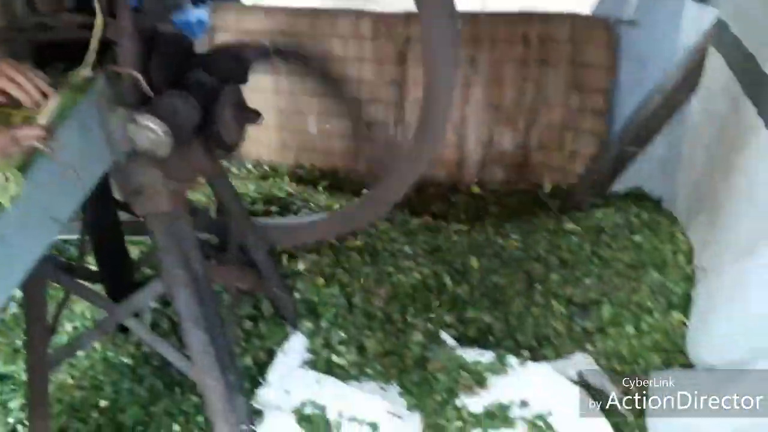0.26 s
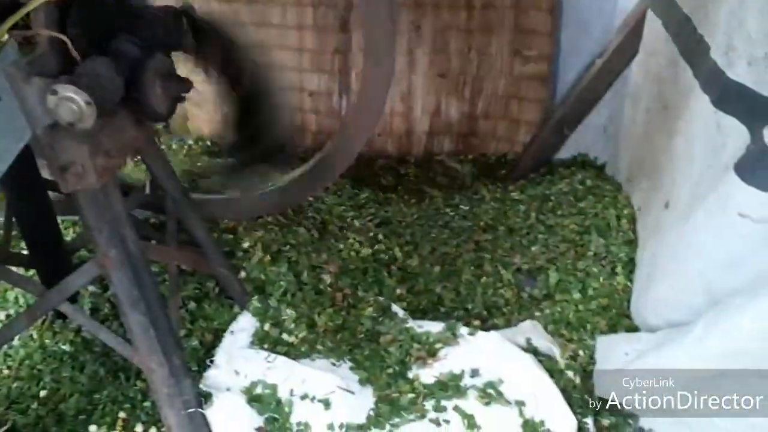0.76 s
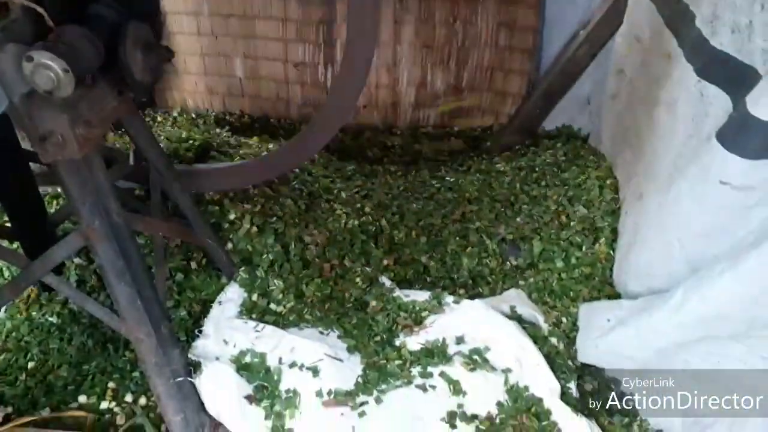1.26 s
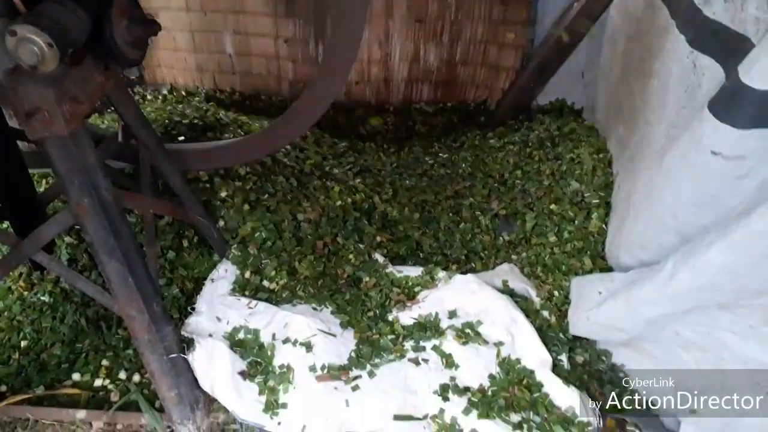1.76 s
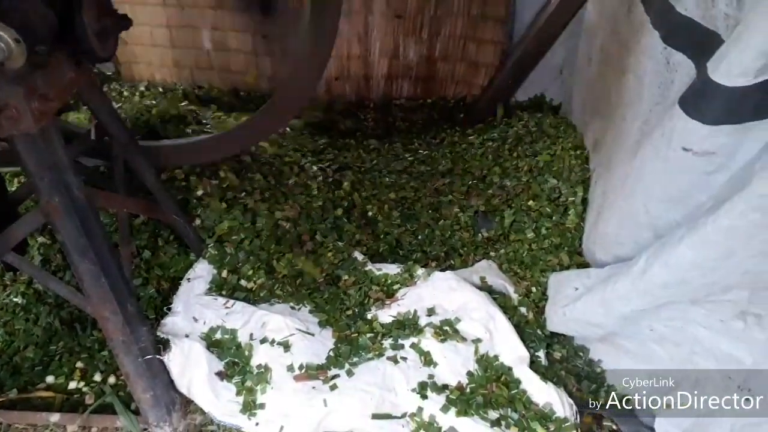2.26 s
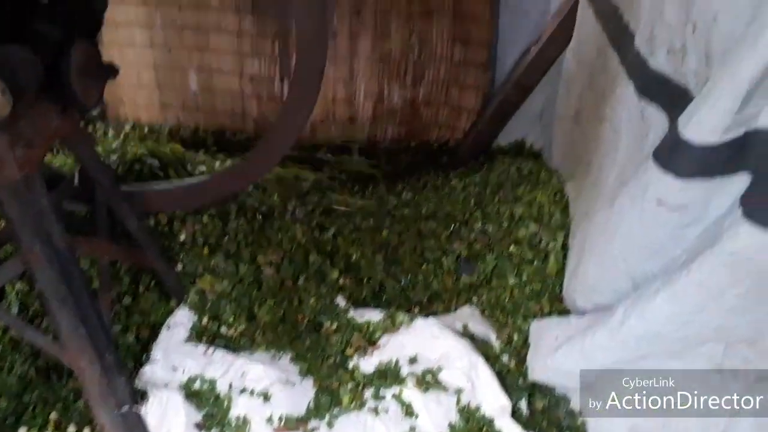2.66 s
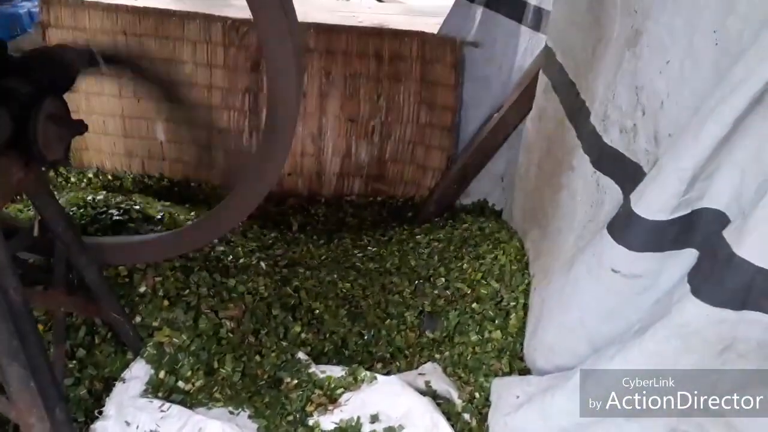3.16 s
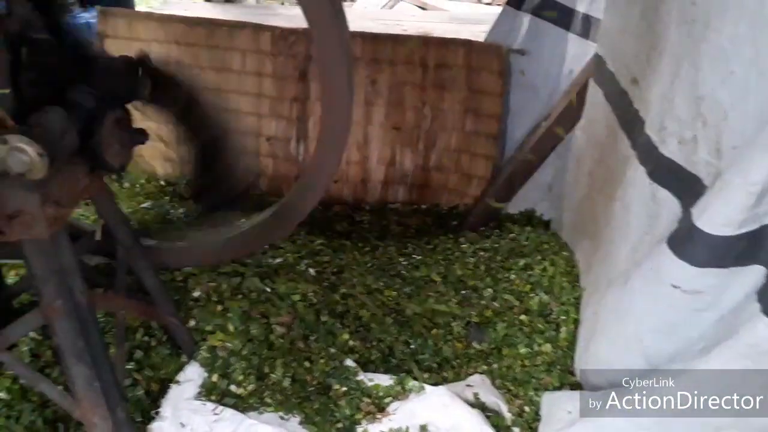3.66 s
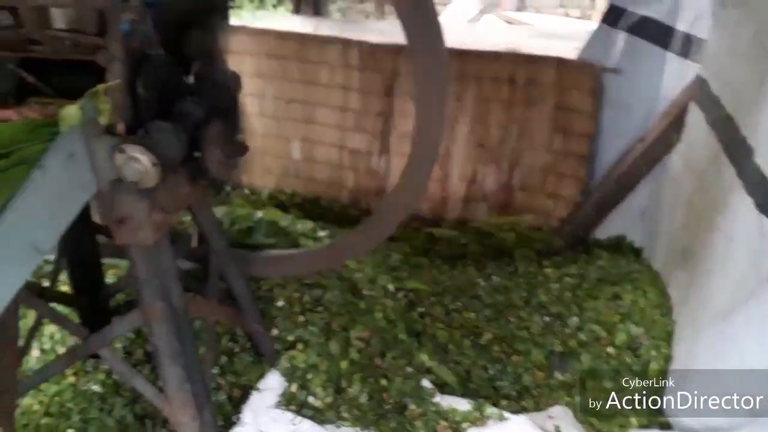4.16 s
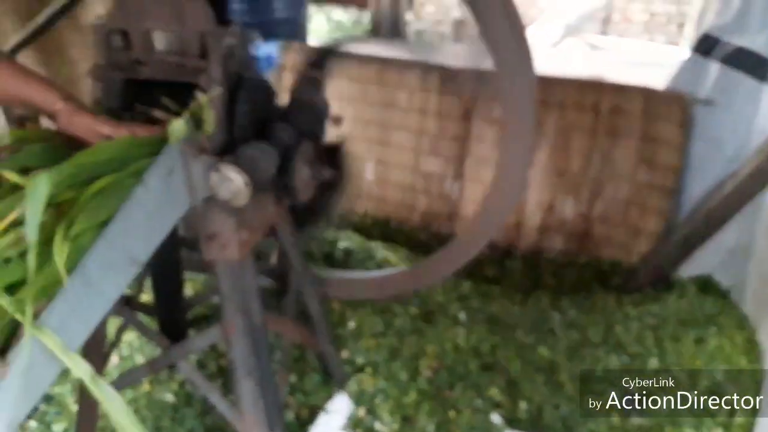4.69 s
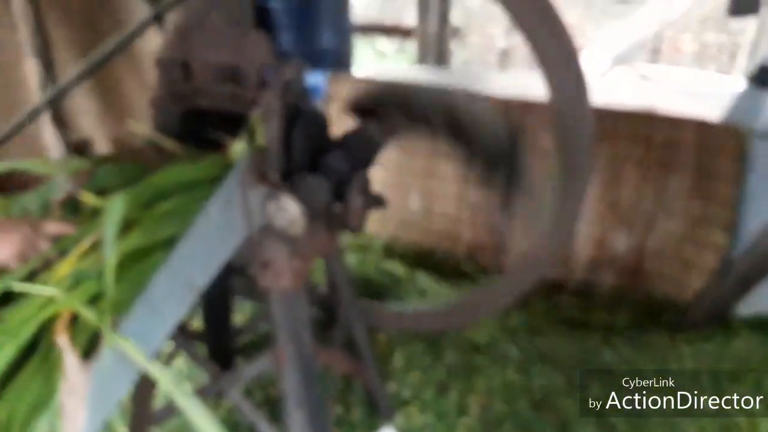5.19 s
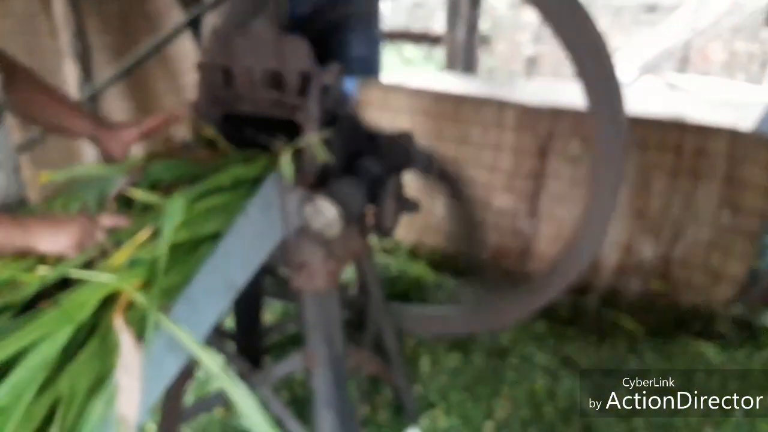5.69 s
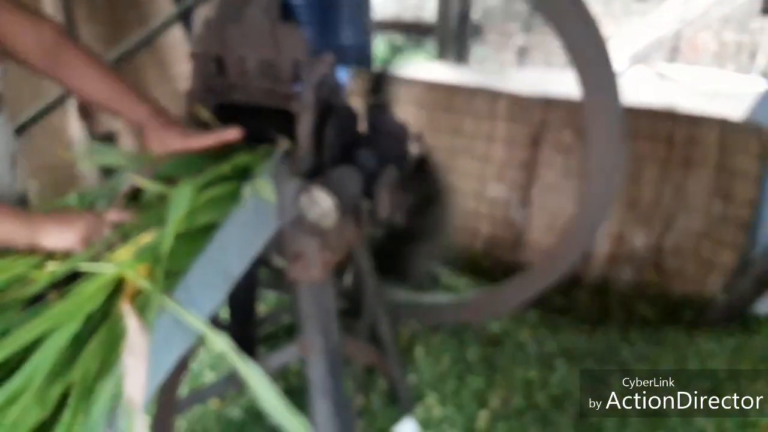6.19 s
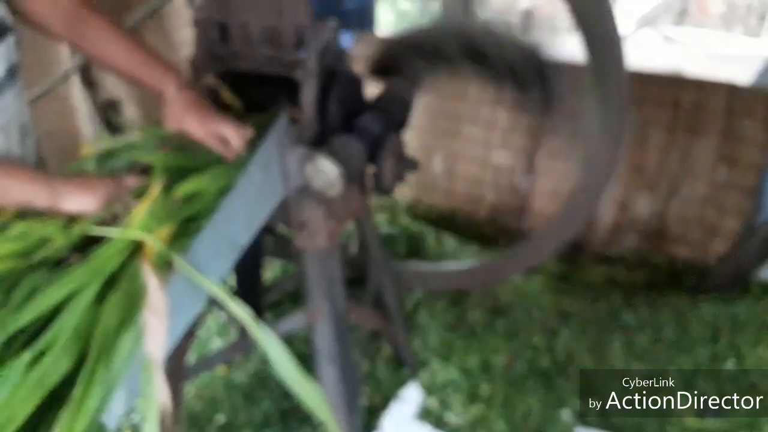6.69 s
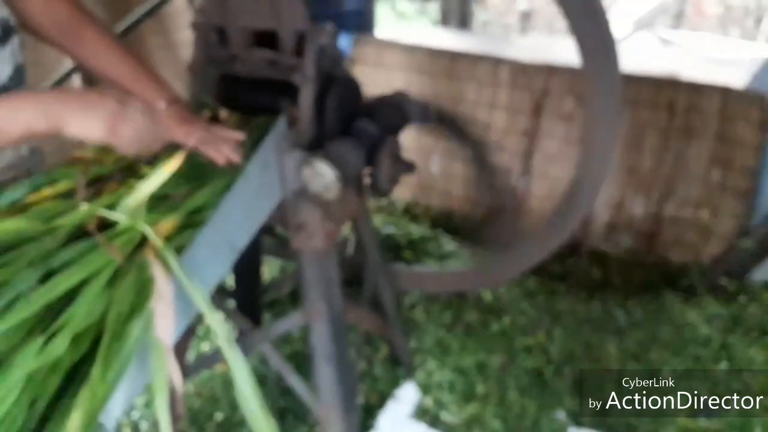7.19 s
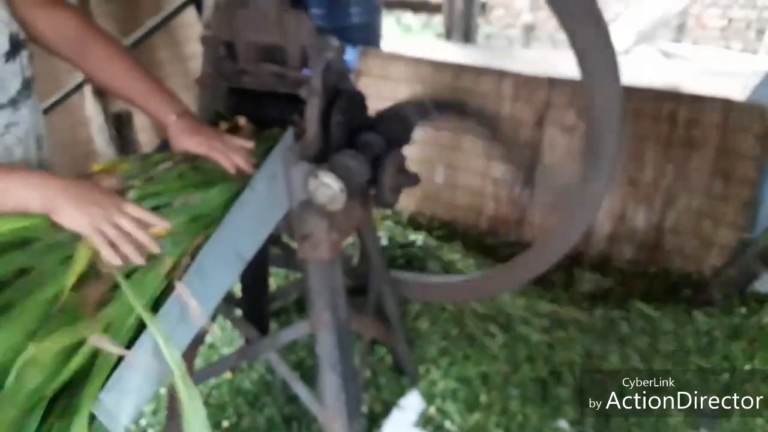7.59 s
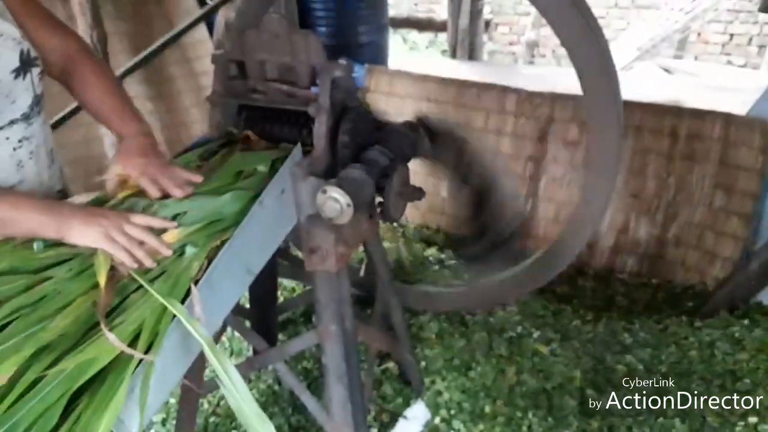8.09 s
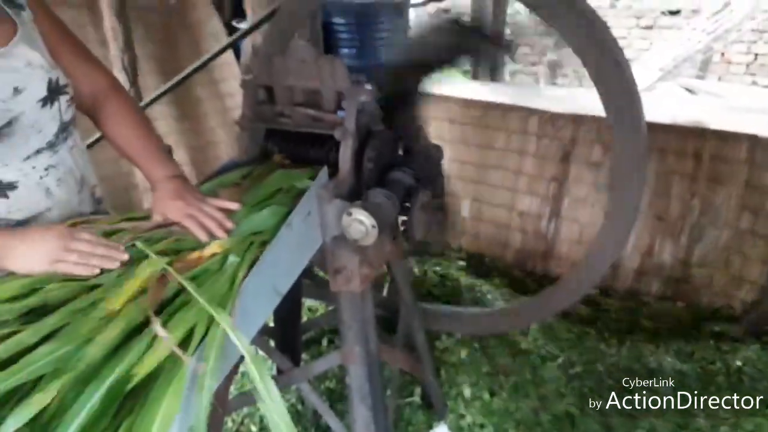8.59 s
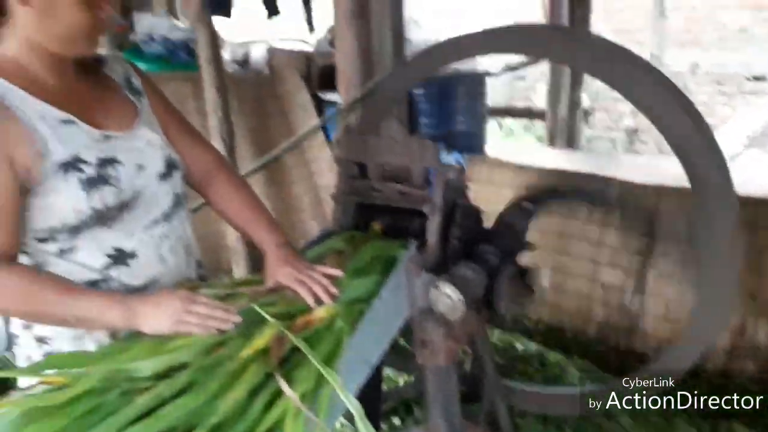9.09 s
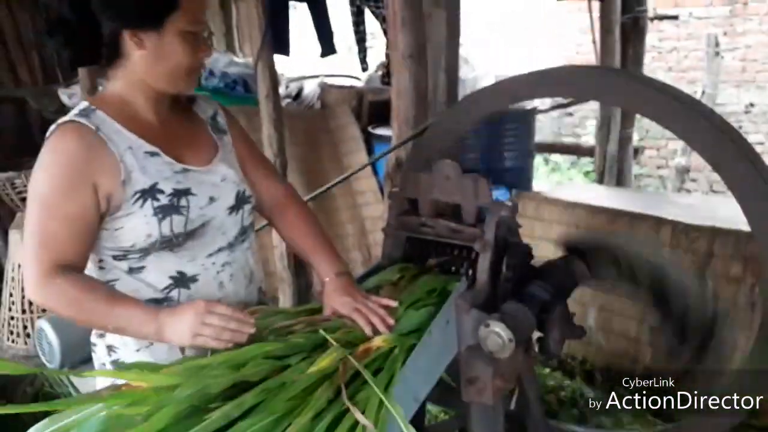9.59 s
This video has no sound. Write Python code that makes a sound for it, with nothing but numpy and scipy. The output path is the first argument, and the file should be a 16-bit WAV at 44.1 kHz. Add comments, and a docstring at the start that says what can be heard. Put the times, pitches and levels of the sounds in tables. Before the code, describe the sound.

Close in an open shed, a heavy iron flywheel cutter chops green grass at almost three cuts a second. Each stroke fizzes, crunches and thumps, followed by a metallic rebound, a brief scrape and a patter of chaff. Loose gears clack unevenly between cuts over a rumbling frame. The cuts are fuller early on, then lighter with more prominent clacks. A small handheld microphone gives little deep bass.

```python
"""Flywheel chaff cutter in a shed

A belt-driven flywheel chaff cutter chops green grass in an open shed, nearly three cuts a second.
Each knife crunches through the bundle (random snaps), thumps on the shear plate and rebounds.
A thicker bite makes the crunch, the scrape of steel and the shower of chaff louder.
Between cuts loose gears clack (bursts of impacts) and the knife rubs, with a squeal now and then
(a wavering tone), over a rumble."""
import sys
import numpy as np
from scipy import signal
from scipy.io import wavfile

SR = 44100
rng = np.random.default_rng(int(sys.argv[2]) if len(sys.argv) > 2 else 0)


def output_pcm(signal):
    """Save a mono or channel-first signal as 16-bit PCM at the path in sys.argv[1].

    Samples are clipped to [-1, 1] before scaling.
    """
    pcm = np.clip(np.atleast_2d(signal).T, -1, 1) * 32767
    wavfile.write(sys.argv[1], SR, np.round(pcm).astype(np.int16))


N = 434385

# Levels in the tables are relative: each source adds its own offset.
# knife passes: (closing thump [s], bite thickness re usual [dB], thump [dB],
#                rebound after thump [s], rebound [dB])
CUTS = [(-.037, 1, -11, .046, -16), (.337, 1.5, -20.5, 0.046, -16.5), (.702, 1.5, -18, 0.038, -20.5),
        (1.065, 1, -19, 0.049, -19), (1.43, 4, -19, 0.049, -20), (1.801, 2.5, -16.5, .043, -17),
        (2.168, 2, -19, .04, -14), (2.525, 2.5, -18.5, 0.054, -17), (2.898, 2.5, -18.5, 0.046, -18),
        (3.266, 2.5, -17.5, 0.046, -14.5), (3.629, 3, -20.5, 0.052, -13), (3.996, 2.5, -16, 0.03, -17),
        (4.362, -1.5, -23, 0.046, -19.5), (4.728, -1.5, -21.5, 0.039, -20.5),
        (5.1, -2.5, -25.5, 0.052, -24), (5.458, 1, -22, .053, -23), (5.834, -3.5, -25, 0.041, -31),
        (6.202, -2.5, -21, 0.043, -33), (6.571, -4.5, -26, .06, -30.5), (6.939, -5, -27, 0.043, -26),
        (7.299, -2, -21, 0.06, -24.5), (7.671, 0, -20.5, 0.044, -23.5), (8.032, -0.5, -20, 0.052, -17.5),
        (8.413, 0, -19.5, .044, -24.5), (8.781, -0.5, -17, .043, -23), (9.149, -1, -17.5, 0.048, -18.5),
        (9.514, 1, -21, 0.045, -21.5), (9.875, -1, -20, .047, -21)]
# hard clacks of the feed gears and rollers: (time [s], bright clack [dB], frame knock [dB])
CLACKS = [(.205, -29, -30), (.897, -31.5, -30.5), (1.204, -33, -25), (1.319, -23.5, -21.5),
          (1.404, -23, -20), (1.906, -30.5, -27), (1.991, -23, -21), (2.058, -21, -18.5),
          (2.503, -19.5, -24), (2.632, -19.5, -17.5), (2.691, -28, -19.5), (3.002, -26.5, -23),
          (3.372, -21.5, -21.5), (3.761, -15.5, -12.5), (3.898, -30, -28), (3.953, -13.5, -14.5),
          (4.21, -32, -30), (4.241, -17, -26.5), (4.258, -22.5, -22.5), (4.489, -27.5, -25),
          (4.689, -14.5, -18), (4.907, -26, -30), (5.004, -25.5, -26.5), (5.21, -28, -26),
          (5.235, -25.5, -22), (5.361, -24.5, -28), (5.422, -15.5, -17.5), (5.8, -23.5, -25.5),
          (6.035, -28, -27.5), (6.103, -27, -26), (6.149, -14.5, -18.5), (6.362, -33, -33.5),
          (6.479, -32, -32), (6.711, -28.5, -36), (6.849, -25, -28.5), (6.89, -15, -19.5),
          (7.065, -32, -33), (7.213, -26, -28.5), (7.259, -23, -20), (7.436, -17, -22), (7.576, -17.5, -25),
          (7.62, -17.5, -20), (7.897, -29, -33), (7.952, -23, -25), (7.996, -14.5, -18),
          (8.172, -16.5, -19.5), (8.304, -29, -27.5), (8.361, -20, -24), (8.732, -17.5, -23),
          (8.899, -24.5, -31), (8.916, -15.5, -20.5), (8.976, -25.5, -35), (9.054, -18.5, -22.5),
          (9.109, -21.5, -25), (9.256, -26, -23.5), (9.42, -26.5, -26.5), (9.65, -26.5, -33)]
# soft take-ups of gear slack, two per cut: (after thump [s], bright clack [dB], frame knock [dB])
SLACK = [(.128, -37, -34.5), (.25, -40, -38.5)]
SLACK_SPREAD_S, SLACK_SPREAD_DB = 0.018, 2
# other rubs of the knife, from faint high ringing to a loud squeal:
# (start [s], end [s], squeal [dB], high ringing [dB])
RUBS = [(1.478, 1.528, -44, -35), (2.023, 2.083, -34, -29), (2.665, 2.762, -48, -34.5),
        (2.935, 3.0, -35, -35), (3.31, 3.345, -31, -35), (3.368, 3.433, -40, -31), (3.69, 3.814, -43, -30),
        (4.48, 4.525, -42, -35), (4.842, 4.87, -37, -33), (5.205, 5.283, -39, -35.5),
        (5.423, 5.445, -17, -26), (5.445, 5.525, -25, -34), (5.87, 5.953, -41, -41.5),
        (6.05, 6.137, -38, -35), (6.24, 6.318, -38, -39.5), (6.737, 6.82, -41, -37),
        (7.105, 7.12, -33, -38), (7.463, 7.494, -26, -35), (7.712, 7.735, -29, -42),
        (7.837, 7.85, -35.5, -34), (8.016, 8.14, -25.5, -33.5), (9.303, 9.39, -42, -36)]
# time the knife takes through the bundle: (time [s], slicing time [s])
SLICING_TIME = [(0, 0.06), (4.4, .057), (6.2, .068), (9.8, 0.071)]
# level of the frame's low drone: (time [s], level [dB])
DRONE_LEVEL = [(0, -57), (1.75, -53), (2.05, -35.5), (2.7, -49), (5.3, -50.5), (7, -54), (7.6, -48.5),
               (9.8, -48)]

# upper modes (natural ringing pitches) of the knife steel: (pitch [Hz], width [Hz], level [dB])
STEEL_MODES = [(5110, 94, 4), (7730, 50, -2), (8310, 45, 4.5), (8500, 54, -12), (9500, 30, -11),
               (9400, 31, -13), (11930, 45, 4.5), (12600, 56, -10), (12850, 50, -1), (13600, 55, 5),
               (14350, 60, -8), (14930, 29, 2)]
# modes of the iron frame and feed box: (pitch [Hz], width [Hz], height over the broad colour [dB])
FRAME_MODES = [(176, 12.4, 1.5), (314.5, 35, 5), (436.7, 35, 7.5), (539, 29, 1), (628, 200, 3.5),
               (769, 50, 6), (856, 110, 7.5), (1140, 50, 2), (1260, 55, 4), (1362, 28, 5), (1460, 140, 3),
               (1820, 150, 1), (4040, 270, 1.5), (4280, 200, 3.5), (5120, 84, 8), (8400, 110, 1),
               (12160, 140, 2)]
# the knife's strong squealing mode: (pitch [Hz], width [Hz])
SQUEAL_MODE = (5058, 25.2)

# broad tone colours, each: (frequency [Hz], level per Hz [dB])
SLICE_COLOUR = [(40, -42.5), (150, -7), (300, -2.5), (800, 0), (1200, -3.5), (2300, -10), (3300, -0.5),
                (4300, -3), (6200, -5), (7600, -8), (9500, -13), (11500, -11.5), (15500, -19)]
FIZZ_COLOUR = [(100, -30), (800, -8), (2300, -10), (4000, 0), (6000, 0.5), (7600, 1.5), (9500, -5),
               (11500, 2.5), (15500, -3.5)]  # leaves at the knife edge
THUMP_COLOUR = [(40, -51), (110, -15), (300, -7.5), (450, -4), (750, -1), (1100, -9.5), (1900, -4.5),
                (2500, -12.5), (3500, -4), (6000, -12), (7600, -7.5), (9400, -16), (11200, -12.5),
                (15500, -27)]
CLACK_COLOUR = [(300, -32), (1200, -7), (2300, -10), (3200, 1), (4000, -0.5), (5300, -1), (6400, -8),
                (8000, -6), (9600, -14.5), (12500, -8.5), (15500, -32)]
KNOCK_COLOUR = [(50, -48), (160, -4), (300, -3.5), (480, -4), (850, 2.5), (1300, 0), (1800, -0.5),
                (2800, -6), (6000, -31.5)]
CHAFF_COLOUR = [(40, -26.5), (150, -7.5), (300, 3.5), (480, -8), (800, -3), (1400, -1.5), (2300, -6.5),
                (4000, -5), (6400, -13.5), (9500, -16.5), (13000, -8.5), (15500, -13)]
RUMBLE_COLOUR = [(25, -74), (60, -35), (100, -4), (300, 4.5), (500, -5), (850, -4), (1500, -6.5),
                 (2300, -7), (4200, -7.5), (6500, -7), (9500, -12), (13000, -7), (15500, -11)]
OVERTONE_COLOUR = [(1000, -29), (4500, 6.5), (6500, -4.5), (8200, -2), (9800, -6), (12500, 0.5),
                   (15500, -11)]  # dense wash between the knife's upper modes
# how long the shed's reflections take to fall by 60 dB: (frequency [Hz], time [s])
SHED_DECAY = [(150, 0.45), (800, 0.22), (4000, 0.17), (15000, 0.19)]

# ring of a struck tooth; the spread is a share of the pitch
TOOTH_HZ, TOOTH_SPREAD = 4150, 0.076
# ring of the rebounding knife, and the frame's knock relative to the rebound
REBOUND_RING_HZ, REBOUND_KNOCK_DB = 5190, -2.5
# scrape on the plate after each cut; growth is dB more per dB of bite
SCRAPE_AFTER_S, SCRAPE_S = 0.036, 0.04
SCRAPE_SQUEAL_DB, SCRAPE_RINGING_DB, SCRAPE_GROWTH = -44, -36, 1.8
DRONE_HZ, DRONE_WIDTH_HZ = 311, 25
EDGE_HZ = 15560  # upper limit of the sound
HZ = np.fft.rfftfreq(8192, 1 / SR)  # frequencies at which the colours are computed


def gain_of(db):
    """Turns decibels into amplitude."""
    return 10 ** (np.asarray(db) / 20)


def evened(x):
    """Scales a sound to an rms (average strength) of 1."""
    return x / np.sqrt(np.mean(x ** 2) + 1e-20)


def at_level(sound, db):
    """Sets the rms of a hit's first 15 ms."""
    return gain_of(db) * sound / np.std(sound[:SR * 15 // 1000])


def read(points, hz):
    """Reads a table along a logarithmic frequency axis."""
    f, value = np.transpose(points)
    return np.interp(np.log(hz + 1), np.log(f + 1), value)


def add(mix, s, sound):
    """Adds a sound that starts at time s, cutting off what lies outside the mix."""
    start = round(s * SR)
    sound = sound[max(-start, 0):]
    part = mix[max(start, 0):][:len(sound)]
    part += sound[:len(part)]


def drift(size, rate_hz):
    """Random wandering of rms about 1: straight lines between random points."""
    knots = rng.standard_normal(4096)
    return 1.2 * np.interp(np.arange(size) * rate_hz / SR, np.arange(len(knots)), knots)


def crackle(size, per_s, spread_db):
    """Random tiny snaps of uneven size and either sign, rms 1."""
    chance, sign, big = rng.random((size, 3)).T
    snaps = chance < per_s / SR
    sizes = gain_of(spread_db * np.minimum(-np.log(big + 1e-9), 4))
    return evened(snaps * np.sign(sign - 0.5) * sizes)


def pops(force, per_s, low_hz, high_hz, cycles, spread_db):
    """Separate small snaps, each ringing for a few cycles at its own pitch; force scales their size."""
    t, out = np.arange(SR // 25) / SR, np.zeros(N)
    for when, pitch, size in rng.random((round(per_s * N / SR), 3)):
        hz = low_hz * (high_hz / low_hz) ** pitch
        start = int(when * N)
        grain = np.sin(2 * np.pi * hz * t) * np.exp(-hz * t / cycles)
        grain *= (hz / low_hz) ** 0.12  # higher snaps are slightly stronger
        strength = force[start] * gain_of(spread_db * min(-np.log(size + 1e-9), 3))
        add(out, start / SR, strength * grain)
    return out


def resonate(x, hz, width_hz):
    """Passes a sound through one resonance of gain 1."""
    return signal.lfilter(*signal.iirpeak(hz, hz / width_hz, SR), x)


def body(colour, ring):
    """The frame's response to a click, energy 1: a broad colour, with modes raised by the factor ring."""
    modes_db = sum(height / (1 + (2 * (HZ - f) / width) ** 2) for f, width, height in FRAME_MODES)
    db = read(colour, HZ) + ring * modes_db
    log_gain = np.log(gain_of(np.r_[db, db[-2:0:-1]]))
    # this choice of phase starts the response at once, with nothing before the click
    spectrum = np.exp(np.conj(signal.hilbert(log_gain)))
    response = np.fft.ifft(spectrum).real[:len(HZ)]
    return response / np.linalg.norm(response)


def through_frame(x, colour, ring):
    """Sends a continuing sound through the frame."""
    return signal.oaconvolve(x, body(colour, ring))[:N]


def blow(response, attack_s, hold_s, decay_s, spread_db, crack=0.0):
    """A dense cluster of impacts that holds briefly and dies, with an optional first crack, heard through a body."""
    t = np.arange(SR // 6) / SR
    cluster = np.exp(-np.maximum(t - hold_s, 0) / decay_s)
    first_crack = crack * np.exp(-t / 0.00075)
    shape = (1 - np.exp(-t / attack_s)) * (cluster + first_crack)
    return signal.fftconvolve(shape * crackle(len(t), 8000, spread_db), response)


def knife(x, modes_db=9.5):
    """Rings the knife steel: narrow modes over a wash of overtones, in a response of energy 1."""
    click = np.eye(1, 4096)[0]
    modes = sum(gain_of(db) * resonate(click, hz, width) for hz, width, db in STEEL_MODES)
    response = body(OVERTONE_COLOUR, ring=0)[:len(click)] + gain_of(modes_db) * modes
    return signal.oaconvolve(x, response / np.linalg.norm(response))[:N]


def rumble(level_db=-39, unsteady_db=2.6, swell_db=0.5, growth=0.35, throb_db=3.5):
    """Belt and bearings shake the frame, more under a thick bite; one low mode swells into an uneven drone."""
    t = np.arange(N) / SR
    times, bites_db, *_ = np.transpose(CUTS)
    strain_db = growth * np.interp(t, times, bites_db)
    strain_db = strain_db + unsteady_db * drift(N, 14) + swell_db * drift(N, 4.4)
    shaking = gain_of(level_db + strain_db) * crackle(N, 7000, 3.7)
    tremble = through_frame(shaking, RUMBLE_COLOUR, ring=0.93)
    tone = resonate(rng.standard_normal(N), DRONE_HZ, DRONE_WIDTH_HZ)
    drone = evened(tone * gain_of(throb_db * drift(N, 12)))
    return tremble + drone * gain_of(np.interp(t, *np.transpose(DRONE_LEVEL)))


def rattles(tick_db=-40, clunk_db=-41, chink_db=-37, chinks_per_s=9, chink_spread_db=3, chink_s=0.0064):
    """Dry stems tick in the feed trough, loose parts clunk, and stray chips chink on the spinning knives."""
    steady, t = np.ones(N), np.arange(SR // 10) / SR
    ticks = pops(steady, per_s=90, low_hz=2500, high_hz=5800, cycles=3, spread_db=4)
    clunks = pops(steady, per_s=30, low_hz=260, high_hz=1600, cycles=6, spread_db=3)
    chance, size = rng.random((N, 2)).T
    chip_gain = gain_of(chink_db + chink_spread_db * np.minimum(-np.log(size + 1e-9), 3))
    chips = (chance < chinks_per_s / SR) * chip_gain
    fading = signal.oaconvolve(chips, np.exp(-t / chink_s))[:N]
    chinks = knife(fading * crackle(N, 9000, 1.8))
    return gain_of(tick_db) * ticks + gain_of(clunk_db) * clunks + chinks


def chaff(level_db=-28.5, growth=1.46, peak_s=0.032, fall_s=0.087):
    """Pieces patter down and rollers drag in fresh stalks after each cut; a thick bite sheds far more."""
    flow, t = np.zeros(N), np.arange(SR // 2) / SR
    shower = np.minimum(t / peak_s, 1) * np.exp(-np.maximum(t - peak_s, 0) / fall_s)
    for s, bite_db, *_ in CUTS:
        add(flow, s, gain_of(level_db + growth * bite_db) * shower)
    patter = flow * gain_of(4.3 * drift(N, 55)) * crackle(N, 2500, 1.3)
    return through_frame(patter, CHAFF_COLOUR, ring=0.41)


def strikes():
    """Lists blows of metal on metal: (time [s], clack [dB], knock [dB], ring [Hz])."""
    rows = [(*clack, TOOTH_HZ) for clack in CLACKS]
    for s, _, _, rebound_s, rebound_db in CUTS:
        rows.append((s + rebound_s, rebound_db, rebound_db + REBOUND_KNOCK_DB, REBOUND_RING_HZ))
        for after_s, bright_db, low_db in SLACK:
            late_s, more_db = rng.standard_normal(2) * (SLACK_SPREAD_S, SLACK_SPREAD_DB)
            rows.append((s + after_s + late_s, bright_db + more_db, low_db + more_db, TOOTH_HZ))
    # every blow rings at a slightly different pitch
    return [(*row, hz * np.exp(TOOTH_SPREAD * rng.standard_normal())) for *row, hz in rows]


def gears(clack_db=0, knock_db=-3.5, tooth_db=6, tooth_width_hz=450,
          jingle_db=-9, jingle_rise_s=0.0019, jingle_s=0.021):
    """Metal strikes and chatters briefly; the frame answers lower and longer, and the knife jingles just after."""
    (out, jolts), t = np.zeros((2, N)), np.arange(SR // 6) / SR
    teeth, frame = body(CLACK_COLOUR, ring=0.15), body(KNOCK_COLOUR, ring=0.82)
    jingle = (1 - np.exp(-t / jingle_rise_s)) * np.exp(-t / jingle_s)
    for s, db, low_db, hz in strikes():
        clack = blow(teeth, attack_s=0.0002, hold_s=0.005, decay_s=0.0085, spread_db=2.0, crack=0.5)
        clack = clack + gain_of(tooth_db) * resonate(clack, hz, tooth_width_hz)
        add(out, s, at_level(clack, db + clack_db))
        knock = blow(frame, attack_s=0.001, hold_s=0.0036, decay_s=0.022, spread_db=2.5)
        # each place on the frame favours a different clank
        knock = knock + 2.0 * resonate(knock, rng.uniform(1135, 1550), 45)
        add(out, s, at_level(knock, low_db + knock_db))
        add(jolts, s, gain_of(db + jingle_db) * jingle)
    return out + knife(jolts * crackle(N, 9000, 2), modes_db=6)


def contacts():
    """Lists rubs of the knife on the plate: (start [s], end [s], squeal [dB], high ringing [dB])."""
    rows = list(RUBS)
    for s, bite_db, *_ in CUTS:
        start, more_db = s + SCRAPE_AFTER_S, SCRAPE_GROWTH * bite_db
        rows.append((start, start + SCRAPE_S, SCRAPE_SQUEAL_DB + more_db, SCRAPE_RINGING_DB + more_db))
    return rows


def rubbing(squeal_db=1, ringing_db=2, ring_s=0.0061, waver_db=4.5, flutter_db=5.0):
    """Rubbing steel builds up a wavering squeal and a gritty high ringing, which linger briefly."""
    t, contact = np.arange(N) / SR, np.zeros((2, N))
    for start, end, *levels in contacts():
        touching = (t > start - ring_s / 2) & (t < end)
        contact[:, touching] += gain_of(levels)[:, None]
    keep = np.exp(-1 / (ring_s * SR))  # share of the ringing kept from one sample to the next
    low, high = signal.lfilter([1 - keep], [1, -keep], contact + 1e-9)
    hz, width = SQUEAL_MODE
    phase = 2 * np.pi * np.cumsum(hz + width * drift(N, 300)) / SR
    squeal = gain_of(waver_db * drift(N, 90)) * np.cos(phase)
    friction = gain_of(ringing_db + flutter_db * drift(N, 80)) * crackle(N, 6000, 4.0)
    # steady friction feeds the narrow modes more than a jolt does
    ringing = knife(high * friction, modes_db=13)
    return gain_of(squeal_db) * low * evened(squeal) + ringing


def thumps(level_db=4, push_db=-20, push_low_hz=85, push_high_hz=230, push_s=0.035):
    """The last packed stalks burst against the shear plate and shake the frame, which also gives a low push."""
    (out, push), frame = np.zeros((2, N)), body(THUMP_COLOUR, ring=1.64)
    fade = np.exp(-np.arange(SR // 4) / SR / push_s)
    for s, _, db, *_ in CUTS:
        thump = blow(frame, attack_s=0.00019, hold_s=0.0098, decay_s=0.014, spread_db=2.5)
        add(out, s, at_level(thump, db + level_db))
        add(push, s, gain_of(db + push_db) * fade)
    bass = signal.butter(3, [push_low_hz, push_high_hz], "bandpass", fs=SR, output="sos")
    low_noise = evened(signal.sosfilt(bass, rng.standard_normal(N)))
    return out + signal.sosfilt(bass, push * low_noise)


def slicing(level_db=-22, fizz_db=-23, stalk_db=-25, rise_s=0.041, bite_s=0.011, lead_s=0.006,
            over_s=0.016, release_s=0.021, fizz_release_s=0.0081, patchy_db=1.36, clump_db=1.3):
    """The curved knife bites the outer leaves with a fizz, then snaps fibres and thick stalks until through."""
    (force, edge), t = np.zeros((2, N)), np.arange(SR // 4) / SR
    for s, bite_db, *_ in CUTS:
        length = np.interp(s, *np.transpose(SLICING_TIME)) + lead_s
        past = np.maximum(t - length - over_s, 0)  # time since the sound began to die away
        pressing = np.minimum(t / rise_s, 1) * np.exp(-past / release_s)
        biting = (1 - np.exp(-(t / bite_s) ** 2)) * np.exp(-past / fizz_release_s)
        add(force, s - length, gain_of(bite_db) * pressing)
        add(edge, s - length, gain_of(bite_db) * biting)
    # the grass gives way in clumps
    force, edge = np.array([force, edge]) * gain_of(clump_db * drift(N, 90))
    fibres = force * gain_of(level_db + patchy_db * drift(N, 200)) * crackle(N, 12000, 1.9)
    leaves = edge * gain_of(fizz_db) * crackle(N, 20000, 1.7)
    stalks = pops(force, per_s=300, low_hz=900, high_hz=6000, cycles=9, spread_db=2.2)
    crunch = through_frame(fibres, SLICE_COLOUR, ring=0.82)
    fizz = through_frame(leaves, FIZZ_COLOUR, ring=0.3)
    return crunch + fizz + gain_of(stalk_db) * stalks


def shed(x, wet_db=-11, count=3):
    """Scattered reflections from mat, wall and roof, shifting as the wheel turns and the listener moves."""
    wet = np.zeros(N)
    turn = 2 * np.pi * 0.7 * np.arange(N) / SR  # the pattern shifts in a steady 0.7 Hz cycle
    for k in range(count):
        # random reflections begin after 5 ms and fade at each frequency's own pace
        taps = crackle(SR // 2, 3000, 1) * (np.arange(SR // 2) > SR // 200)
        hz, t, z = signal.stft(taps, SR, nperseg=256)
        fading = z * gain_of(-60 * t / read(SHED_DECAY, hz)[:, None])
        tail = signal.istft(fading, SR, nperseg=256)[1]
        share = np.cos(turn + np.pi * k / count) * np.sqrt(2 / count)
        wet += signal.oaconvolve(x * share, tail / np.linalg.norm(tail))[:N]
    return x + gain_of(wet_db) * wet


def scene():
    """Mixes the whole machine, from background to cutting, in its shed."""
    background = rumble() + rattles() + chaff()
    metal = gears() + rubbing()
    cutting = thumps() + slicing()
    return shed(background + metal + cutting)[None]


def record(dry, low_cut_hz=68):
    """The small microphone loses deep bass and rounds off the loudest peaks; then the top is cut off."""
    thin = signal.sosfilt(signal.butter(2, low_cut_hz, "highpass", fs=SR, output="sos"), dry)
    rounded = thin / (1 + thin ** 6) ** (1 / 6)
    band_limit = signal.firwin(401, EDGE_HZ, window=("kaiser", 8), fs=SR)
    return signal.oaconvolve(rounded, band_limit[None], "same")


dry = scene()
out = record(dry)
output_pcm(out)
```